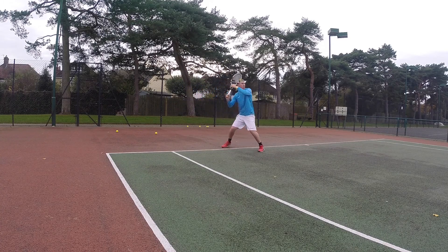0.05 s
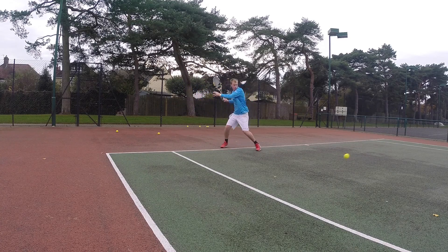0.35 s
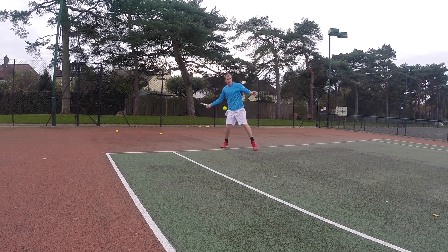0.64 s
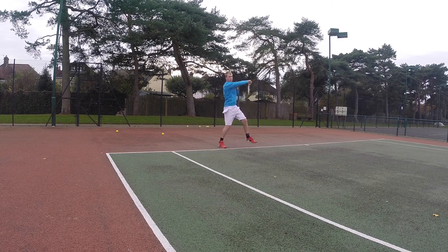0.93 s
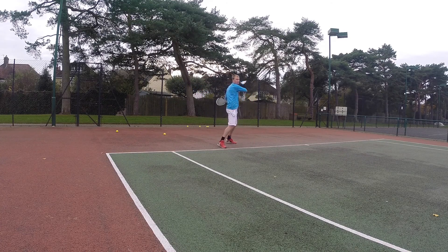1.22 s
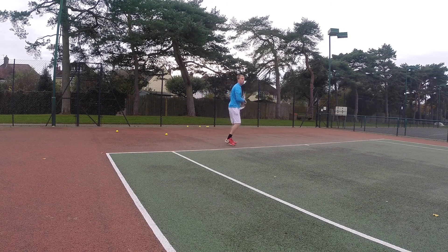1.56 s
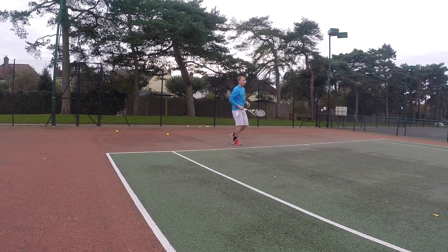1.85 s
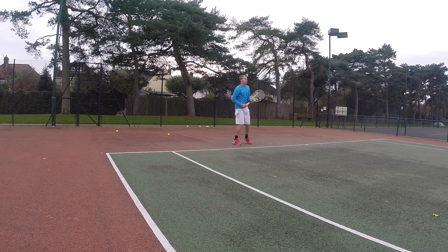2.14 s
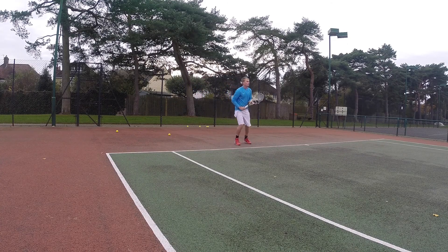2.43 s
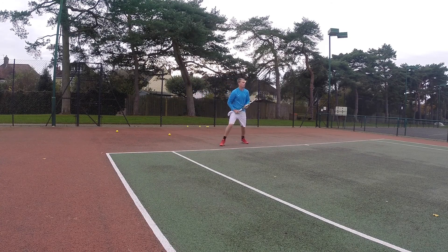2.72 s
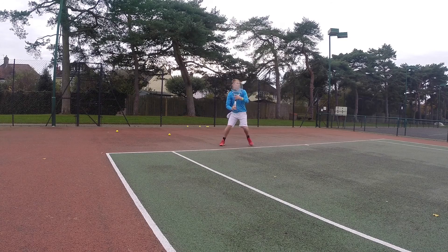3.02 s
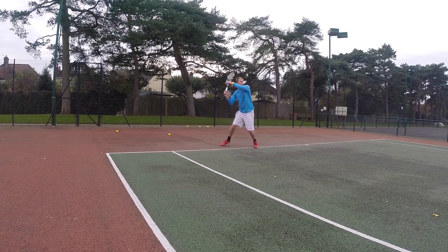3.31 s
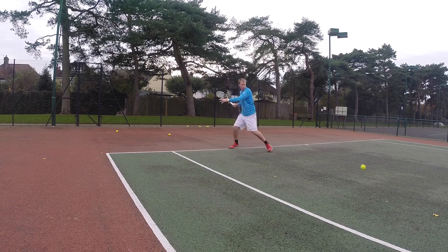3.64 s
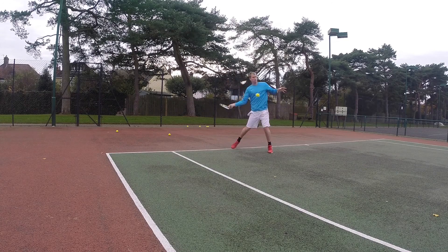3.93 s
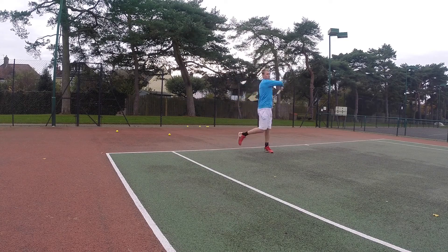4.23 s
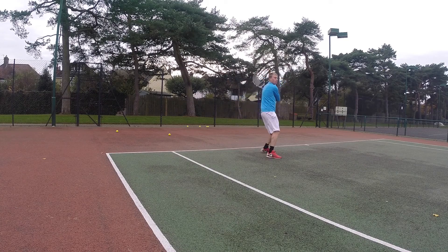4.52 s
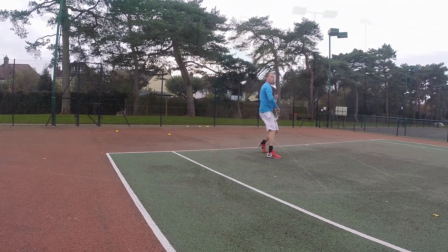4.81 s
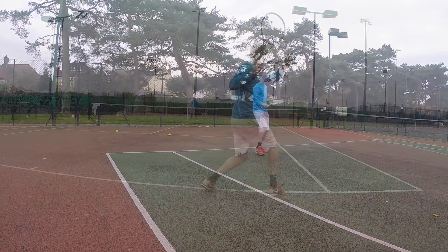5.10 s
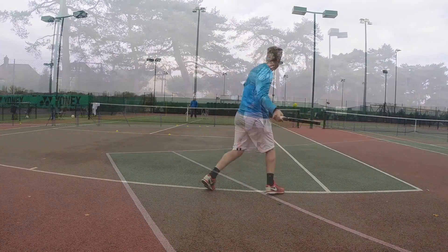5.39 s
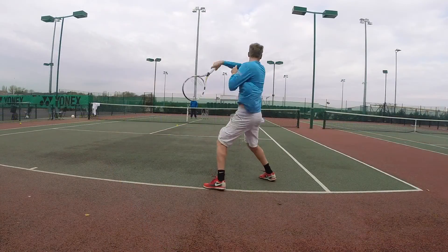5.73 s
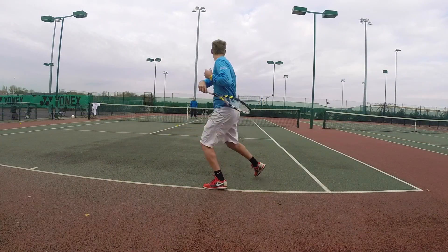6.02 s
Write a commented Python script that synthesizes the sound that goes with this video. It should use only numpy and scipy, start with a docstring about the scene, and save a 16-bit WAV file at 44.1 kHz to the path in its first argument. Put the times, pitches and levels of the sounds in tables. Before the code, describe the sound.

Three sharp tennis racket pops, with soft ball bounces, one rattling fence crash and faint shoe scuffs over distant traffic.

```python
"""Tennis forehands on an outdoor court

The ball bounces on the hard court, then squashes into the racket strings and pops off them.
One shot crashes into the fence close by and leaves it rattling; shoes scuff on loose grit.
Trees and fencing scatter these sounds. Far traffic murmurs; electronics hiss and whine very faintly."""
import sys
import numpy as np
from scipy import signal
from scipy.fft import irfft, next_fast_len
from scipy.io import wavfile

SR = 44100
rng = np.random.default_rng(int(sys.argv[2]) if len(sys.argv) > 2 else 0)


def master_out(mix):
    """Clip the mix to full scale and print it as 16-bit PCM to the path in sys.argv[1]."""
    frames = np.transpose(np.atleast_2d(mix))
    ceiling = np.clip(frames, -1, 1)
    pcm = np.round(ceiling * 32767).astype(np.int16)
    wavfile.write(sys.argv[1], SR, pcm)


N = 275833
TIME = np.arange(N) / SR
AGE = TIME[:SR // 2]   # seconds since a blow

# forehands: start_s, thump_db, thump_hz, string_bed_hz, pop_hz, shell_db, echo_delay_s, off_centre_db
FOREHANDS = [(0.8293, -9, 262, 560, 1058, -20.5, 0.091, -16), (4.1015, -11, 255, 538, 844, -18.5, 0.093, 0),
             (5.62, -8, 205, 495, 800, -23, 0.070, 1)]
# tone colour of a sole on grit, before it is shifted up in pitch: pitch_hz, level_db
SCUFF_COLOUR = [(100, -3), (500, 3.5), (1000, -2), (1400, -5), (2200, -20), (6000, -29)]


def from_db(db):
    """Turn decibels into a number to multiply a sound by."""
    return 10 ** (np.asarray(db) / 20)


def add(out, start_s, sound):
    """Mix a sound in at a given time."""
    i = int(round(start_s * SR))
    out[i:i + len(sound)] += sound[:N - i]


def noise(colour, size, shift=1):
    """Noise of strength (rms) 1, shaped by rows of pitch_hz, level_db; shift multiplies the pitches."""
    hz, db = np.transpose(colour)
    padded = next_fast_len(size)
    bins_hz = np.fft.rfftfreq(padded, 1 / SR) + 1
    gain = from_db(np.interp(np.log(bins_hz), np.log(hz * shift), db))
    x = irfft(gain * np.exp(2j * np.pi * rng.random(len(bins_hz))), padded)[:size]
    return x / x.std()


def narrow_noise(hz, width_hz, size):
    """Noise of strength 1, gathered around one pitch."""
    step = 1 + width_hz / hz
    peak = [(hz / step ** 3, -70), (hz / step, -12), (hz, 0), (hz * step, -12), (hz * step ** 3, -70)]
    return noise(peak, size)


def grainy_noise(colour, grain_db, shift=1):
    """Noise of strength 1, broken into millisecond grains."""
    grains = np.tanh(noise([(100, 1), (400, -3), (900, -11), (2500, -60)], len(AGE)))
    x = noise(colour, len(AGE), shift) * from_db(grain_db * grains)
    return x / x.std()


def wavering(hz, wander_hz, rate_hz, size=N):
    """A tone of strength 1 whose pitch wanders at random."""
    wander = noise([(rate_hz, 0), (4 * rate_hz, -40), (16 * rate_hz, -100)], size)
    return np.sqrt(2) * np.sin(2 * np.pi * np.cumsum(hz + wander_hz * wander) / SR)


def low_pass(x, hz):
    """Soften everything above a pitch."""
    return signal.sosfilt(signal.butter(2, hz, fs=SR, output="sos"), x)


def high_pass(x, hz):
    """Soften everything below a pitch."""
    return signal.sosfilt(signal.butter(2, hz, "high", fs=SR, output="sos"), x)


def resonances(x, peaks):
    """Boost or weaken a few pitch ranges, given as rows of pitch_hz, width_hz, boost_db."""
    for hz, width_hz, db in peaks:
        band = signal.lfilter(*signal.iirpeak(hz, hz / width_hz, fs=SR), x + 1e-18)
        x = x + (from_db(db) - 1) * band
    return x


def smooth(x, time_s):
    """A running average that forgets the past over about time_s."""
    memory = np.exp(-1 / (time_s * SR))
    return signal.lfilter([1 - memory], [1, -memory], x)


def swell(rise_s, sharpness):
    """A loudness curve that climbs to 1 in rise_s, then dies away."""
    x = np.minimum(AGE / rise_s, 40)
    return (x * np.exp(1 - x)) ** sharpness


def fade(ring_s):
    """A loudness curve that falls 60 dB in ring_s."""
    return np.exp(-np.minimum(np.log(1000) * AGE / ring_s, 40))


def sine(hz):
    """One pure tone, starting from zero."""
    return np.sin(2 * np.pi * hz * AGE)


def ring(tones, tuning, spread_db):
    """A blow sets each natural tone of an object ringing, with a random strength of its own."""
    return sum(from_db(db + spread_db * rng.standard_normal()) * sine(hz * tuning) * fade(ring_s)
               for hz, db, ring_s in tones)


def scatter(x, colour, envelope):
    """Smear a sound into a small cloud of reflections."""
    cloud = noise(colour, len(AGE)) * envelope
    return signal.fftconvolve(x, cloud / np.linalg.norm(cloud))[:len(x)]


def electronics(whine_s=.077):
    """Faint electronics: a tone warbling thirty times a second, a steady high note and three whines."""
    # tones of a whine: pitch_hz, level_db
    whine_tones = [(3410, -77), (6820, -69.5), (10230, -78), (13600, -73)]
    warble_hz = 5080 + 130 * np.sin(2 * np.pi * 30 * TIME)
    flutter = noise([(30, -8), (120, -10), (600, -45)], N)
    out = from_db(-70.5) * flutter * np.sin(2 * np.pi * np.cumsum(warble_hz) / SR)
    out += from_db(-85) * narrow_noise(hz=7690, width_hz=25, size=N)
    size = int(whine_s * SR)
    for start_s in (2.665, 3.312, 6.075):
        whine = sum(from_db(db) * wavering(hz, wander_hz=hz / 95, rate_hz=190, size=size)
                    for hz, db in whine_tones)
        add(out, start_s, whine * signal.windows.tukey(size, .2))
    return out


def traffic_and_hiss():
    """Far tyres roar under faint microphone hiss; engines rumble, and one low note swells with them."""
    # how the background rises and falls: time_s, roar_and_hiss_db, engines_db
    levels = [(0.0, -45.5, -46), (0.57, -45, -45), (3.6, -45, -45.5), (4.04, -45, -44),
              (4.54, -43.5, -45.5), (4.91, -46, -44.5), (5.28, -47.5, -49.5), (6.25, -43.5, -45.5)]
    # far tyre roar; from about 4 kHz up, microphone hiss with a slight electronic whine at 5.1 kHz:
    # pitch_hz, level_db
    roar_and_hiss_colour = [(240, -9), (400, -10.5), (425, -10), (979, 0), (1180, -5), (1400, -15.5),
                            (2710, -28.5), (4650, -34), (5110, -32), (5780, -36), (6850, -37.5),
                            (11200, -43), (13700, -48), (15300, -47), (16000, -71)]
    # tone colour of the engines: pitch_hz, level_db
    engine_colour = [(8.8, -47), (15, -36), (30, -11.5), (48, -6), (61, -8.5), (76, -8), (118, -9.5),
                     (162, -14), (194, -11.5), (315, -26), (450, -34), (580, -47), (990, -120)]
    time_s, *curves = np.transpose(levels)
    roar_and_hiss_db, engines_db = [np.interp(TIME, time_s, curve) for curve in curves]
    drone_db = -47 + 1.8 * (engines_db - engines_db.mean())
    drone = from_db(drone_db) * wavering(hz=47.6, wander_hz=2.3, rate_hz=4.5)
    roar_and_hiss = from_db(roar_and_hiss_db + 1) * noise(roar_and_hiss_colour, N)
    rumble = from_db(engines_db - 1.5) * noise(engine_colour, N)
    return roar_and_hiss + rumble + drone


def reflections(x):
    """Trees and fencing return countless weak echoes, so each sound lingers as a smooth hush."""
    # the hush, octave by octave: pitch_hz, level_db (relative to the direct sound), ring_s
    octaves = [(253, -18, 0.98), (490, -25, 1), (990, -23.5, 0.48), (1860, -19, 0.78), (4050, -19, 0.97),
               (6960, -26.5, 0.59)]
    out = np.zeros(N)
    for hz, db, ring_s in octaves:
        octave = signal.butter(2, [hz / np.sqrt(2), hz * np.sqrt(2)], "band", fs=SR, output="sos")
        power = signal.sosfilt(octave, x + 1e-9) ** 2
        lingering = smooth(smooth(power, ring_s / np.log(1e6)), time_s=0.0048)
        hush = signal.sosfilt(octave, rng.standard_normal(N))
        out += from_db(db) * np.sqrt(lingering) * hush / hush.std()
    return out


def footwork(count=10, loudest_db=-60, spread_db=8):
    """The soles brush the court very lightly at random moments."""
    out = np.zeros(N)
    for when, softness, hardness in rng.random((count, 3)):
        brush = grainy_noise(SCUFF_COLOUR, grain_db=7, shift=2.3 + 1.5 * hardness) * swell(0.0047, 1.1)
        add(out, when * TIME[-1], from_db(loudest_db - spread_db * softness) * brush)
    return out


def shoes(grains=7, grain_low_hz=1900, grain_high_hz=8000):
    """Soles slide over grit and a few grains crunch; weight lowers the hiss and makes the rubber rub."""
    # scuffs: start_s, rise_s, level_db, weight (on the sole, 0 to 1)
    scuffs = [(1.638, 0.0025, -49.5, 0.5), (3.165, 0.011, -58.5, 0), (3.745, 0.0089, -57.5, .05),
              (4.483, .008, -48.5, .05), (4.497, 0.01, -47, 0.88), (4.540, 0.0048, -56, .05),
              (4.838, 0.0028, -59, 1), (5.066, 0.0057, -53, .05), (5.109, 0.0097, -54, 0.82),
              (5.484, 0.0083, -51.5, 0), (5.679, 0.021, -49, 0.73), (5.726, .017, -42, 0.65)]
    # the hollow of sole and shoe: pitch_hz, width_hz, boost_db
    shoe_hollow = [(1690, 300, -2.5), (2150, 320, 4.5), (2820, 620, -14), (4400, 310, 2), (6740, 540, 1),
                   (8400, 600, 0)]
    out = np.zeros(N)
    for start_s, rise_s, db, weight in scuffs:
        rub = from_db(12) * weight ** 2 * grainy_noise(SCUFF_COLOUR, grain_db=8, shift=1.45)
        hiss = grainy_noise(SCUFF_COLOUR, grain_db=6, shift=6.9 - 1.7 * weight)
        add(out, start_s, from_db(db) * (hiss + rub) * swell(rise_s, 1.5))
        for when, pitch in rng.random((grains, 2)):
            crunch = sine(grain_low_hz * (grain_high_hz / grain_low_hz) ** pitch) * fade(0.0084)
            add(out, start_s + rise_s * (0.36 + 2 * when), from_db(db + 2.5) * crunch)
    return low_pass(low_pass(resonances(out, shoe_hollow), hz=9600), hz=11100)


def wire_mesh(max_clinks=5, gap_s=.021, fall_db_per_s=88):
    """The fence wire settles in short shivers, each a dying run of uneven clinks."""
    # shivers: start_s, length_s, level_db
    shivers = [(1.573, 0.026, -49.5), (1.637, .03, -44), (1.882, 0.094, -46)]
    out = np.zeros(N)
    for start_s, length_s, db in shivers:
        for k in range(max_clinks):
            age_s = gap_s * (k + 0.23 * rng.uniform(-0.94, 1)) if k else 0
            pitch_hz = 2230 + 110 * rng.standard_normal()
            clink = narrow_noise(pitch_hz, width_hz=770, size=len(AGE)) * swell(0.0021, 0.41)
            if age_s < length_s:
                add(out, start_s + age_s, from_db(db - fall_db_per_s * age_s) * clink)
    return out


def fence(crash_s=1.1969, crash_db=-4.5, blows=10, first_gap_s=.0051, slowing=1.5):
    """The ball cracks into the fence; the loose panel knocks and jingles, ever slower and weaker."""
    # natural tones of the panel: pitch_hz, level_db, ring_s
    panel_tones = [(301, -11, 0.12), (836, -15, 0.21), (1103, -7, 0.24), (1166, -5.5, 0.088),
                   (1340, -8.5, .08), (1690, -8.5, 0.042), (1870, -13, 0.15), (2240, -16, 0.11),
                   (2660, -12.5, 0.045), (5470, -21, .08)]
    # jingling wire: pitch_hz, level_db
    jingle_colour = [(200, -13), (1200, 16.5), (2600, -9), (3800, -5), (6500, -1.5), (9000, -6.5),
                     (10000, -8), (11300, -6.5), (13000, -23), (15000, -34)]
    knock_fall_db_per_s, panel_fall_db_per_s, jingle_fall_db_per_s = 115, 163, 179
    crack = sine(hz=2000) * swell(0.00023, 0.83)
    crack += 0.15 * sine(hz=2600) * fade(0.011)
    crack += 0.17 * sine(hz=1004) * fade(0.038)
    crack += 0.15 * sine(hz=267) * fade(0.0096)
    crack = high_pass(crack, hz=171)
    out = np.zeros(N)
    for k in range(blows):
        age_s = first_gap_s * (k + .08 * rng.uniform(-1, 1)) ** slowing if k else 0
        start_s = crash_s + age_s
        crack_db = -27 - knock_fall_db_per_s * age_s if k else crash_db
        add(out, start_s, from_db(crack_db) * crack)
        add(out, start_s + 0.00113, from_db(crack_db - 0.5) * crack)   # echo off the ground
        panel = ring(panel_tones, tuning=1 + 0.0228 * rng.standard_normal(), spread_db=3.5)
        add(out, start_s, from_db(-22.5 - panel_fall_db_per_s * age_s) * panel)
        jingle = grainy_noise(jingle_colour, grain_db=8) * swell(.0015, 0.24)
        add(out, start_s, from_db(-28 - jingle_fall_db_per_s * age_s) * jingle)
    return out


def bounces():
    """The hollow ball ticks and rings briefly as it meets the court, and thumps as it flattens."""
    # landings: start_s, thump_db
    landings = [(0.4857, -20), (1.878, -31), (2.513, -29), (3.6887, -19.5)]
    tick = 1.8 * sine(hz=2420) * fade(0.00046)
    tick += 0.25 * sine(hz=1940) * fade(0.011) + 0.5 * sine(hz=1185) * fade(0.013)
    tick = low_pass(low_pass(tick, hz=4300), hz=4800)
    tick = resonances(tick, [(3800, 840, 4.6)])
    out = np.zeros(N)
    for start_s, thump_db in landings:
        add(out, start_s, from_db(11.5 + 1.43 * thump_db) * tick)   # harder bounces are brighter
        add(out, start_s + 0.00038, -from_db(thump_db) * sine(hz=244) * swell(0.0021, 1.9))
    return out


def swishes():
    """The racket head cuts the air, fastest just as it meets the ball."""
    # rushing air: pitch_hz, level_db
    air_colour = [(100, -14), (300, 2), (1500, -4), (5000, -11), (9000, -20), (15000, -37)]
    speed = sum(np.exp(-np.abs(TIME - start_s) / 0.03) for start_s, *_ in FOREHANDS)
    return from_db(-48.5) * noise(air_colour, N) * speed


def strings():
    """The strings ring on after the hit; an off-centre hit brings out their lopsided vibrations."""
    # tones of strings and frame: pitch_hz, level_db, ring_s, share (of the off-centre boost, 0 to 1)
    string_tones = [(539, -0.5, 0.21, 0.23), (861, 1, 0.16, 0.27), (1096, 1.5, 0.13, 0.17),
                    (1360, -1, 0.084, 1), (1824, -7.5, 0.17, 0.93), (1900, -3, 0.11, 0.8),
                    (2360, -6, 0.053, 0), (2450, -2, 0.053, 0.7), (2745, -0.5, 0.029, 0.05),
                    (3330, -18.5, 0.16, 0.4), (4730, -34, 0.083, 0.1)]
    out = np.zeros(N)
    for start_s, *_, off_centre_db in FOREHANDS:
        for hz, db, ring_s, share in string_tones:
            level_db = -26 + db + (share - 0.31) * off_centre_db
            add(out, start_s + .0035, from_db(level_db) * sine(hz) * fade(ring_s))
    return out


def racket():
    """The ball squashes into the strings for about 5 ms and pops as it springs back."""
    # high tones of the ball's shell: pitch_hz, level_db
    shell_tones = [(1150, 4), (1360, 0.5), (1830, -1), (2470, -3.5), (2850, -12.5), (3550, -8), (4850, -10),
                   (5650, -11)]
    # tone colours of the ball's felt and of the echo from the far fence: pitch_hz, level_db
    felt_colour = [(300, 6.5), (1200, -6.5), (2700, -0.5), (3800, -6.5), (5300, -9.5), (7000, -10.5),
                   (10000, -19.5), (15000, -42)]
    echo_colour = [(100, -4.5), (320, -5), (700, -12), (3000, -20), (15000, -43)]
    out = np.zeros(N)
    for start_s, thump_db, thump_hz, bed_hz, pop_hz, shell_db, echo_s, off_centre_db in FOREHANDS:
        # an off-centre hit gives more thud from the string bed and less pop
        bed_db = -10.5 + .12 * off_centre_db
        pop_db = -5.4 - 0.23 * off_centre_db
        hit = from_db(-9.5) * sine(hz=477) * swell(0.0016, 1.1)   # the first touch
        hit += from_db(thump_db) * sine(thump_hz) * swell(0.0029, 2.93)
        hit += from_db(bed_db) * sine(bed_hz) * swell(0.0033, 3.0)
        hit += from_db(pop_db) * sine(pop_hz) * swell(0.0051, 9.4)
        hit += sum(from_db(shell_db + db) * sine(hz) for hz, db in shell_tones) * swell(0.0043, 6.0)
        drag = swell(0.0026, 1.3) + 0.16 * swell(0.0064, 0.48)   # topspin drags felt over the strings
        hit += from_db(-22) * noise(felt_colour, len(AGE)) * drag
        add(out, start_s, hit)
        # the near fence returns a thin tick, a farther fence a dull smeared slap
        add(out, start_s + .038, from_db(-20) * high_pass(hit, hz=6500))
        add(out, start_s + echo_s, from_db(-36) * scatter(hit, echo_colour, swell(0.0088, 0.88)))
    return out


def scene():
    """The play on the court and its reflections, over traffic and electronics, in one channel."""
    # treble peaks and dips from the housing around the microphone: pitch_hz, width_hz, boost_db
    housing = [(3900, 750, -2.5), (4880, 780, 2), (6900, 590, 3), (9800, 700, -11)]
    play = racket() + bounces() + shoes() + footwork() + swishes() + fence() + wire_mesh()
    foreground = resonances(play + strings() + reflections(play), housing)
    return (foreground + traffic_and_hiss() + electronics())[None]


def record(dry, stop_hz=16300):
    """Flatten any peak beyond full scale, then cut away the highest treble."""
    treble_cut = signal.cheby2(16, 70, stop_hz, fs=SR, output="sos")
    return signal.sosfilt(treble_cut, np.clip(dry, -1, 1))


dry = scene()
out = record(dry)
master_out(out)
```